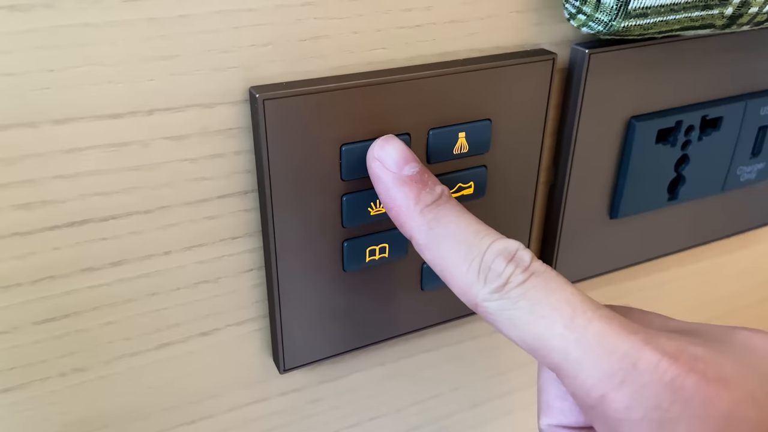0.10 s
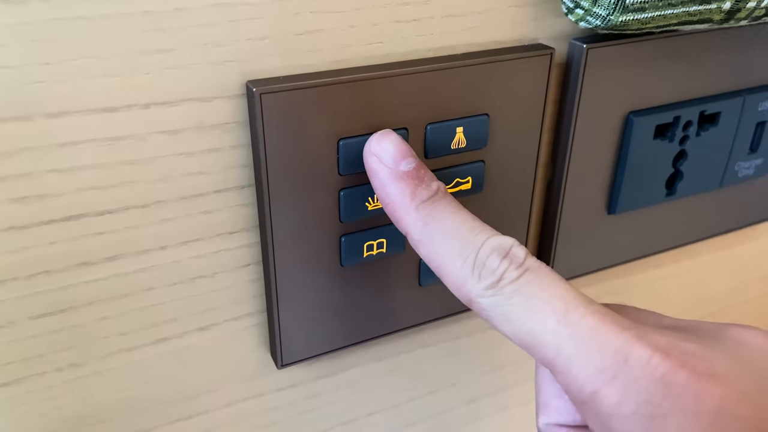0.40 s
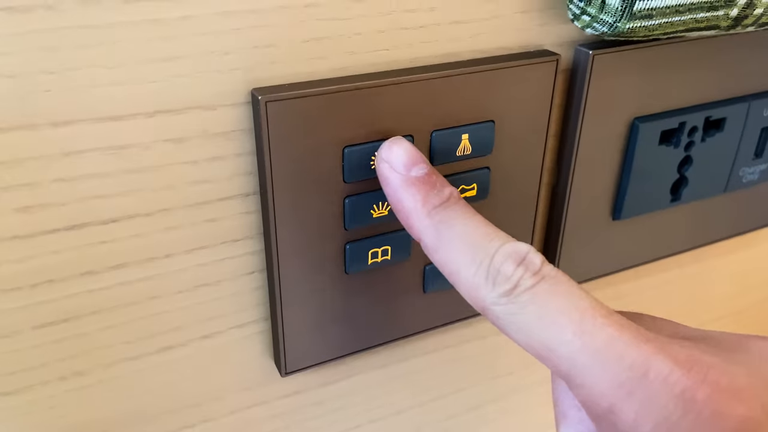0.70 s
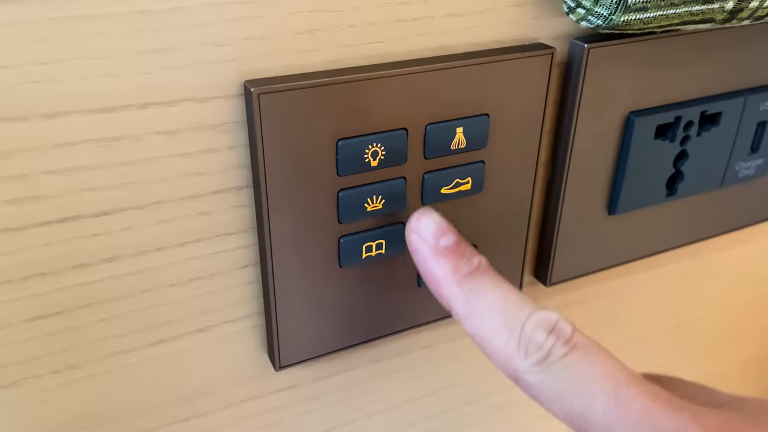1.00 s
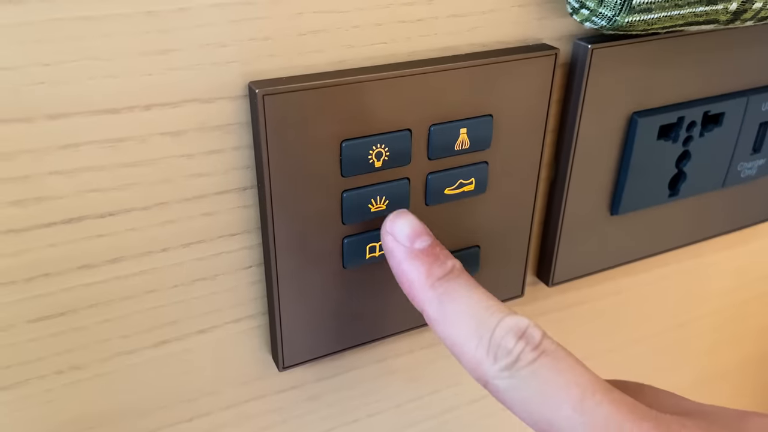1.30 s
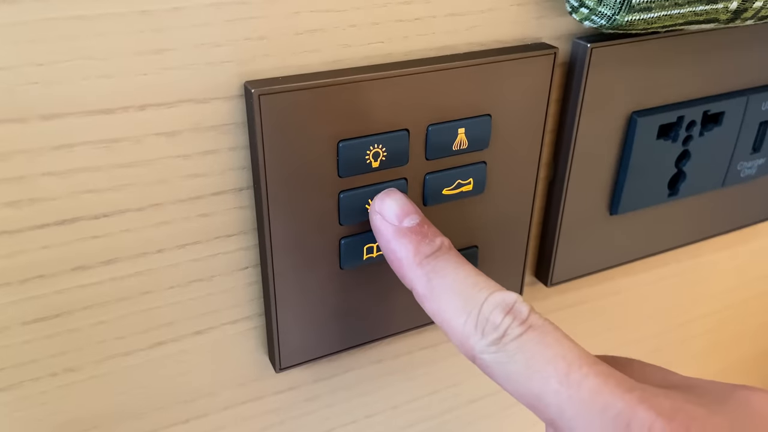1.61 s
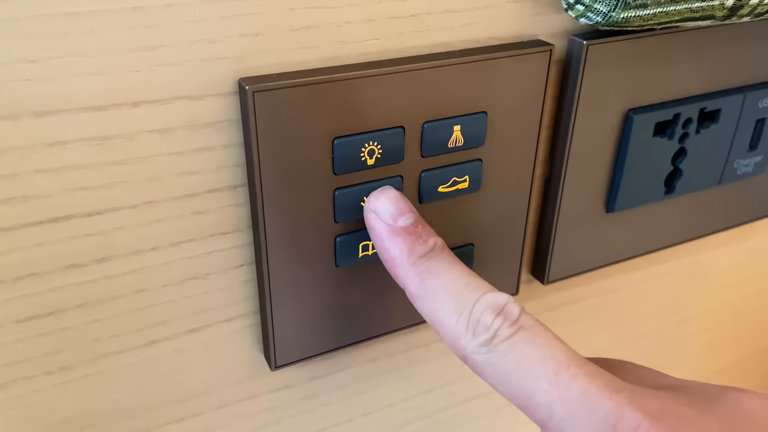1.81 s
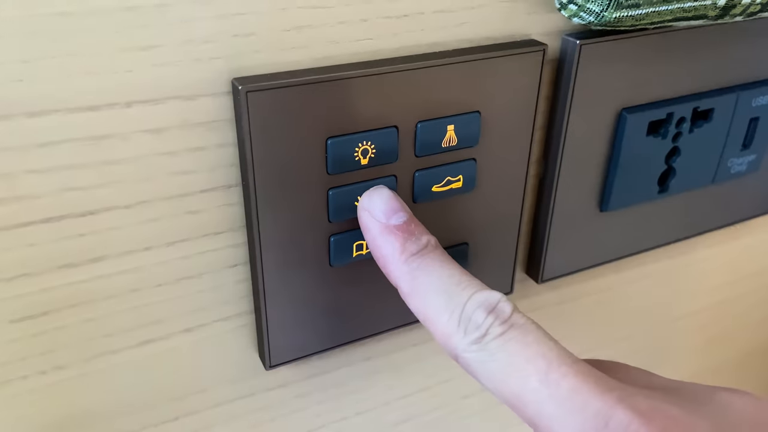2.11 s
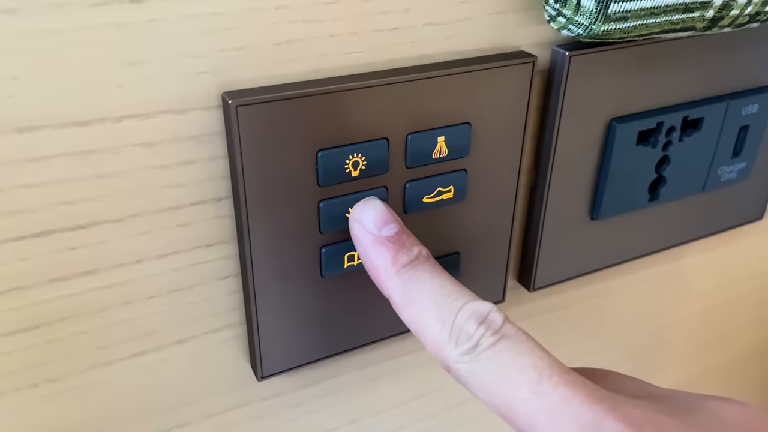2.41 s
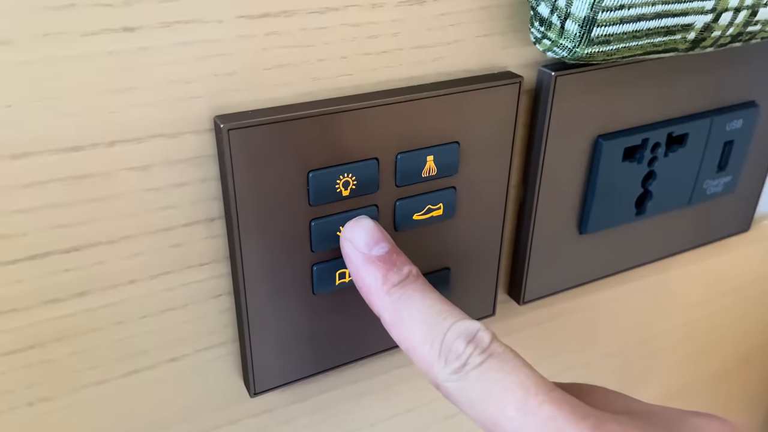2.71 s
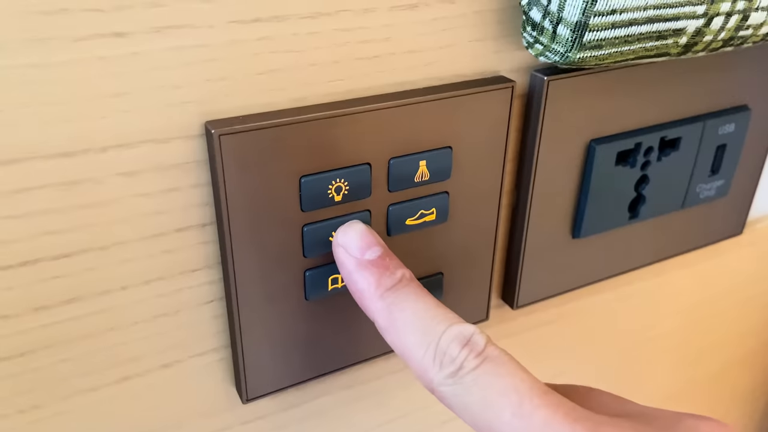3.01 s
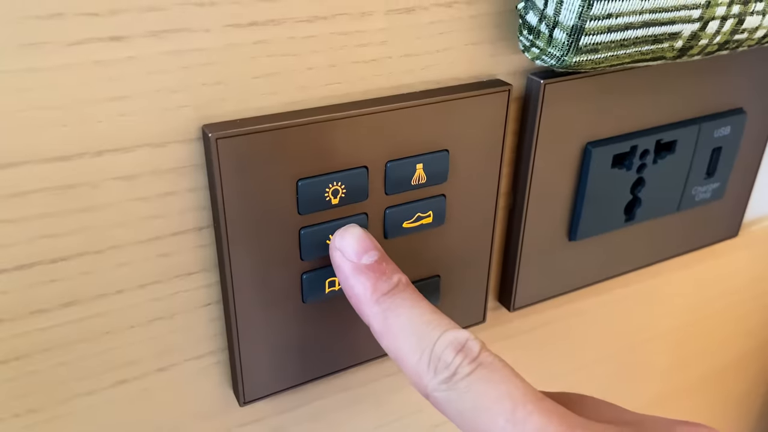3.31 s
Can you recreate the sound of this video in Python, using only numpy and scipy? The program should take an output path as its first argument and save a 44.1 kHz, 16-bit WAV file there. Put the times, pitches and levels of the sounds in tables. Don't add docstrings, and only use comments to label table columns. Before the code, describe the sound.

Push-buttons on a wall panel snap crisply in and out, over a low distant engine rumble

```python
import sys
import numpy as np
from scipy import signal
from scipy.fft import rfft, irfft
from scipy.io import wavfile

SR = 44100
rng = np.random.default_rng(int(sys.argv[2]) if len(sys.argv) > 2 else 0)


def log_audio(samples):
    frames = np.atleast_2d(samples).T
    limited = np.clip(frames, -1, 1)
    pcm = np.round(limited * 32767).astype(np.int16)
    wavfile.write(sys.argv[1], SR, pcm)


def volts_from_db(level):
    exponent = np.asarray(level, float) / 20
    return 10 ** exponent


N = 152145
LEAD_IN = 200


def rms_one(x):
    return x / np.sqrt(np.mean(x ** 2) + 1e-20)


def at_hz(points, hz):
    table_hz, value = np.transpose(points)
    return np.interp(np.log(hz), np.log(table_hz + 1), value)


def sides(db):
    return volts_from_db(np.array([[.5], [-.5]]) * db)


def drift(rate):
    r = np.exp(-80 * np.pi * rate / SR)
    slow = signal.lfilter([1], [1, -2 * r, r * r], rng.standard_normal(N // 40 + 2002))[2000:]
    return np.interp(np.arange(N) / 40, np.arange(len(slow)), rms_one(slow - slow.mean()))


def band(x, low_hz, high_hz):
    return signal.sosfilt(signal.butter(2, [low_hz, min(high_hz, .45 * SR)], "band", fs=SR, output="sos"), x)


def banded_noise(spectrum, patchy_db, rate):
    # f/Hz, correlation
    likeness = [(60, 1), (130, 0.75), (220, .85), (350, -0.31), (650, -0.42), (1500, -0.18), (6000, -0.068)]
    # f/Hz, left minus right/dB
    floor_pan = [(60, -2.5), (300, 2), (700, -3), (1300, 1.5), (2400, 8.5), (5000, 0.5), (10000, -1.3)]
    lowest, highest = spectrum[0][0], spectrum[-1][0]
    edges = lowest * 2 ** np.arange(0, np.log2(highest / lowest) + .1, 1 / 3)
    white = rng.standard_normal((2, 2, N + SR))
    out = 0
    for k, (low, high) in enumerate(zip(edges, edges[1:])):
        mid, side = band(white[k % 2], low, high)[:, SR:]
        hz = np.sqrt(low * high)
        alike = np.clip(at_hz(likeness, hz), -1, 1)
        gain = volts_from_db(at_hz(spectrum, hz) + patchy_db * drift(rate)) * sides(at_hz(floor_pan, hz))
        out = out + gain * (np.sqrt(1 + alike) * mid + np.sqrt(1 - alike) * side * [[1], [-1]])
    return rms_one(out)


def air():
    # f/Hz, level/dB per Hz
    rumble = [(19, -33.5), (32, -15.5), (54, -5), (77, 1), (93, 4), (146, -14), (206, -8.5), (307, -37),
              (420, -40.5), (550, -67), (920, -120)]
    # f/Hz, level/dB per Hz
    hiss = [(210, -32.5), (350, 1.5), (524, -11.5), (808, -9.5), (1270, -13), (1870, -12), (3520, -28),
            (10400, -34), (14200, -44.5)]
    # f/Hz, width/Hz, level/dB
    whistles = [(818, 130, -79.5), (9320, 280, -95), (10520, 470, -92), (12200, 1000, -99)]
    out = volts_from_db(-52) * banded_noise(rumble, patchy_db=2.0, rate=9.0)
    out = out + volts_from_db(-69.5) * banded_noise(hiss, patchy_db=-0.4, rate=3.7)
    out = signal.sosfilt(signal.cheby2(8, 40, 13300, fs=SR, output="sos"), out)
    for hz, width_hz, db in whistles:
        whistle = rms_one(band(rng.standard_normal((2, N)), hz - width_hz / 2, hz + width_hz / 2))
        out = out + volts_from_db(db + 1.5 * drift(4.5)) * whistle
    return out


def engine():
    # t/s, firing tone f/Hz, level/dB
    speeding_up = [(0.15, 52.2, -63), (0.252, 52.68, -47.5), (0.77, 56.7, -38), (0.928, 57.64, -46.5),
                   (0.97, 58.87, -40), (1.44, 61.57, -33), (1.638, 63.25, -39), (1.82, 63.3, -51.5),
                   (1.91, 64.23, -41.5), (2.19, 66.12, -47), (2.24, 70.3, -64), (2.31, 67.57, -52),
                   (2.46, 68.13, -47.5), (2.48, 67.8, -67), (2.621, 69.07, -42.5), (3.04, 72.43, -42.5),
                   (3.15, 76.07, -48), (3.45, 73.3, -56)]
    wobble_hz, flutter_db = .5, .5
    s, hz, db = np.transpose(speeding_up)
    t = np.arange(N) / SR
    phase = 2 * np.pi * np.cumsum(np.interp(t, s, hz) + wobble_hz * drift(4.5)) / SR
    fade_in = np.clip(t / s[0], 0, 1)
    level = volts_from_db(np.interp(t, s, db) + flutter_db * drift(4.0)) * fade_in
    return np.sqrt(2) * level * np.sin(phase)


def patch(db):
    t = np.arange(SR // 5) / SR
    edges = np.linspace(13800, 15600, 5)
    fade_t60_s, longest_s = .6, .095
    out = 0
    for strip in zip(edges, edges[1:]):
        length = longest_s * rng.uniform(.55, 1.2) * np.clip((db + 45) / 20, .05, 1)
        gate = np.clip((t - .008) / .005, 0, 1) * np.clip((length - t) / .02, 0, 1)
        noise = gate * volts_from_db(-60 * t / fade_t60_s) * rng.standard_normal((2, len(t)))
        out = out + signal.sosfilt(signal.ellip(4, 1, 50, strip, "band", fs=SR, output="sos"), noise)
    return 2 * volts_from_db(-51.5 - 0.14 * (db + 19)) * out


def tail(colour, ridges, tilt_db):
    # f/Hz, t60/s
    tail_t60 = [(400, 0.55), (1500, 0.51), (3500, 0.47), (7000, 0.52), (14000, 0.57)]
    rise_s, gate_s = 0.0046, 0.11
    early_db, early_t60_s = 23.5, 0.033
    t = np.arange(SR // 3) / SR
    edges = np.geomspace(300, 15700, 27)
    white = rng.standard_normal((2, 2, SR // 3))
    out = 0
    for k, (low, high) in enumerate(zip(edges, edges[1:])):
        hz = np.sqrt(low * high)
        octaves = np.log2(hz / 2000)
        late = volts_from_db(-60 * t / at_hz(tail_t60, hz))
        early = volts_from_db(early_db - 2.3 * octaves - 60 * t / early_t60_s)
        level = volts_from_db(at_hz(colour, hz) + 0.74 * tilt_db * octaves)
        out = out + band(white[k % 2], low, high) * level * (late + early)
    for hz, width_hz, db, t60 in ridges:
        ring = band(rng.standard_normal((2, SR // 3)), hz - width_hz / 2, hz + width_hz / 2)
        out = out + ring * volts_from_db(db - 60 * t / t60)
    out = signal.sosfilt(signal.cheby2(12, 40, 12800, fs=SR, output="sos"), out)
    return (1 - np.exp(-t / rise_s)) * out / (1 + (t / gate_s) ** 4)


def snap(modes, tilt_db):
    # t after/s, level/dB
    contacts = [
        (0, 1.5),
        (.0004, -14),
        (.0009, -17.5),
        (.0014, -17),
        (.0021, -14),
        (.0031, -16.5),
        (.0044, -23.5),
    ]
    # t after/s, left/dB, right/dB
    echoes = [
        (.0042, -25, -24.5),
        (.0075, -23, -25.5),
        (.0145, -27, -26.5),
    ]
    # f/Hz, left leads by/rad
    port_lead = [(600, .2), (2000, 1.1), (2800, 3), (3900, 4.4), (4700, 6.4), (7000, 6), (9000, 3.7),
                 (15000, -5.3)]
    late_cycles, most_cycles = 0.74, 55
    crack_db, crack_t60_s, crack_low_hz = -8, 0.0016, 2510
    since = np.arange(SR // 5) / SR
    body = 0
    for k, (hz, left_db, right_db, t60) in enumerate(modes):
        t = np.maximum(since - late_cycles / hz, 0)
        struck_db = -1.5 + tilt_db * np.log2(hz / 2000) + 0.38 * rng.standard_normal()
        level = (-1) ** k * volts_from_db(np.array([[left_db], [right_db]]) + struck_db)
        rise_cycles = 1 if hz < 2200 else 0.14
        swell = 1 - np.exp(-t * hz / rise_cycles)
        dying = volts_from_db(-60 * t / min(t60, most_cycles / hz))
        body = body + level * np.sin(2 * np.pi * hz * t) * swell * dying
    crack = band(rng.standard_normal(SR // 5), crack_low_hz, SR)
    body = body + volts_from_db(crack_db + 2.9 * tilt_db - 60 * since / crack_t60_s) * crack

    touched = sum(volts_from_db(db) * np.roll(body, int(s * SR), axis=1) for s, db in contacts)
    dull = band(touched, 170, 5350)
    heard = touched
    for s, left_db, right_db in echoes:
        heard = heard + volts_from_db(np.array([[left_db], [right_db]])) * np.roll(dull, int(s * SR), axis=1)

    hz = np.arange(SR // 10 + 1) * 5.
    left_lead = np.interp(hz, *np.transpose(port_lead)) * np.array([[1], [0]])
    turn = left_lead - 2 * np.pi * hz * LEAD_IN / SR
    return irfft(rfft(heard) * np.exp(1j * turn))[:, :SR // 6]


def slide():
    start_s, length_s, level_db, hz = 1.522, .055, -80, 4100
    stroke = np.sin(np.pi * np.clip((np.arange(N) / SR - start_s) / length_s, 0, 1))
    return volts_from_db(level_db) * stroke * rms_one(band(rng.standard_normal((2, N)), .95 * hz, 1.05 * hz))


def buttons():
    # t/s, peak level/dB, brightness/dB per octave
    upper = [
        (0.455, -22.5, -1.0),
        (0.618, -18.5, 0.15),
    ]
    # t/s, peak level/dB, brightness/dB per octave
    middle = [
        (1.865, -17, -0.75),
        (2.059, -14.5, 0.37),
        (2.846, -17.5, -0.77),
        (3.02, -15, 0.83),
    ]
    # t/s, peak level/dB, brightness/dB per octave
    touches = [
        (1.593, -35, 0.1),
        (2.425, -59, -10.0),
        (3.430, -55, -10.0),
    ]
    # f/Hz, left/dB, right/dB, t60/s
    upper_modes = [(545, -27.5, -35.5, 0.015), (686, -30, -28, 0.067), (822, -13.5, -35.5, 0.06),
                   (1150, -1.5, -10, 0.015), (1561, -11, -22.5, 0.03), (1895, -20, -16.5, 0.02),
                   (2450, -25.5, -23.5, 0.015), (3060, -14.5, -18, 0.02), (3640, -19, -18, 0.0094),
                   (4040, -3.5, -4, 0.012), (4850, -17, -19.5, 0.01), (5360, -7.5, -15, 0.0062)]
    middle_modes = [(639, -21.5, -18.5, 0.015), (784.5, -20, -20.5, 0.06), (1147, -11.5, -24.5, 0.025),
                    (1536, -16.5, -26.5, 0.019), (1893, -14, -16.5, 0.03), (2485, -18.5, -16.5, 0.023),
                    (2838, -16, -15.5, 0.02), (3170, -12.5, -9.5, 0.02), (3750, -16, -22.5, 0.012),
                    (4664, -15, -11, 0.015), (5270, -13, -25, 0.01)]
    # f/Hz, left/dB, right/dB, t60/s
    upper_dome = [(6100, -6.5, -11, 0.008), (6800, -25.5, -8, 0.0062), (7100, -8.5, -11.5, 0.0062),
                  (7560, -12.5, -19.5, 0.0032), (8900, -16.5, -13, 0.004), (10000, -14.5, -7, 0.0034),
                  (10600, -8.5, -11, 0.005), (11640, -7.5, -6, 0.004), (13600, -9, -8, 0.003),
                  (14500, -1, -3.5, 0.0038), (15500, -8, -13, 0.003)]
    middle_dome = [(6070, -11.5, -13, 0.008), (6410, -25.5, -23, 0.0086), (7170, -17, -19, 0.008),
                   (7780, -11, -16.5, 0.006), (8560, -7.5, -16, 0.00392), (9950, -14, -15.5, 0.003),
                   (11800, -11.5, -9.5, 0.006), (12300, -11.5, -13, 0.0024), (14500, 0, -0.5, 0.0013),
                   (14500, -6.5, -11, 0.003), (15400, -11.5, -13.5, 0.003), (16200, -19, -17, 0.003)]
    # f/Hz, left/dB, right/dB, t60/s
    rim = [(13000, -7.5, -9, .0025)]
    # f/Hz, left/dB, right/dB, t60/s
    cap_modes = [(1330, -10.5, -18.5, 0.015), (1830, -4.5, -12, 0.02), (2800, -10, -12, 0.01),
                 (3800, -9, -10.5, 0.011), (5000, -27.5, -18, 0.0064), (6130, -23, -16, 0.006),
                 (7300, -10.5, -10.5, 0.0042), (8850, -15, -20, 0.004), (10300, -18.5, -18.5, 0.0035),
                 (12100, -17.5, -20, 0.004), (15500, -7, -8, 0.003)]
    # f/Hz, level/dB
    upper_tail = [(450, -27), (950, -21), (2200, -30), (4200, -30), (7000, -33.5), (8600, -41),
                  (11500, -36), (15000, -62)]
    middle_tail = [(350, -23.5), (800, -27.5), (1900, -29), (3100, -30), (4700, -32), (7500, -39),
                   (11500, -45.5), (14500, -42.5)]
    # f/Hz, width/Hz, level/dB, t60/s
    upper_ridges = [(856, 88, -27, .4), (1570, 80, -28.5, .4), (2980, 160, -21.5, 0.34),
                    (4060, 120, -32, .4), (5230, 300, -30.5, 0.66), (6740, 220, -35, .4)]
    middle_ridges = [(598, 60, -26, 0.44), (773, 66, -22, .4), (1860, 110, -29, .4), (3049, 300, -22.5, .5),
                     (4650, 150, -26.5, .5), (8100, 280, -33, 0.31)]
    struck = ((upper, upper_modes + upper_dome, upper_tail, upper_ridges),
              (middle, middle_modes + middle_dome + rim, middle_tail, middle_ridges),
              (touches, cap_modes, upper_tail, middle_ridges))
    out = np.zeros((2, N + SR))
    for events, modes, colour, ridges in struck:
        for s, db, tilt_db in events:
            parts = ((snap(modes, tilt_db), LEAD_IN), (tail(colour, ridges, tilt_db), 0), (patch(db), 0))
            for part, early in parts:
                start = int(s * SR) - early
                out[:, start:start + part.shape[1]] += volts_from_db(db) * part
    return out[:, :N] + slide()


def scene():
    return air() + engine() + buttons()


def roll_off(x):
    return signal.sosfilt(signal.butter(12, 17100, fs=SR, output="sos"), x)


def record(dry):
    # t/s, left lags by/rad, left minus right/dB
    steer = [(0, 1.13, -4), (2.3, 0.85, -3), (2.798, 0.49, -2.5), (3.198, 0.056, -2), (3.45, 0.0066, 0)]
    s, lag, db = np.transpose(steer)
    t = np.arange(N) / SR
    side = np.array([[.5], [-.5]])
    bass = signal.sosfiltfilt(signal.butter(2, 327, fs=SR, output="sos"), dry)
    pad = SR // 2
    padded = np.pad(bass, ((0, 0), (pad, pad)), "reflect", reflect_type="odd")
    whole = signal.hilbert(padded * signal.windows.tukey(N + pad * 2, .2))[:, pad:pad + N]
    turned = np.real(whole * np.exp(-1j * side * np.interp(t, s, lag)))
    steered = dry - bass + turned * sides(np.interp(t, s, db))
    heard = signal.sosfilt(signal.cheby2(12, 70, 17500, fs=SR, output="sos"), steered)
    return roll_off(heard)


dry = scene()
out = record(dry)
log_audio(out)
```